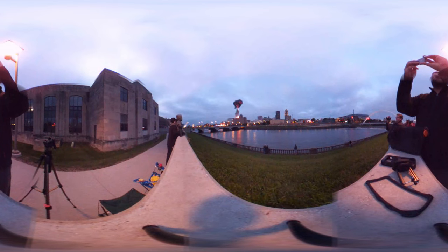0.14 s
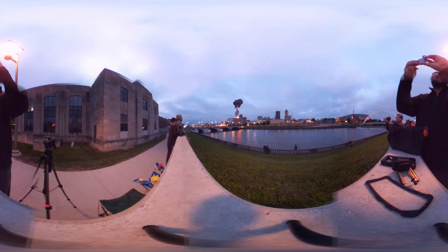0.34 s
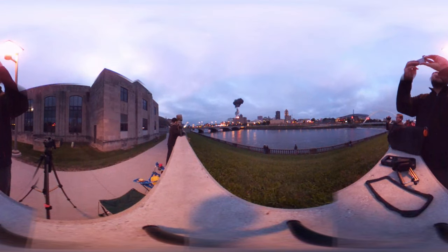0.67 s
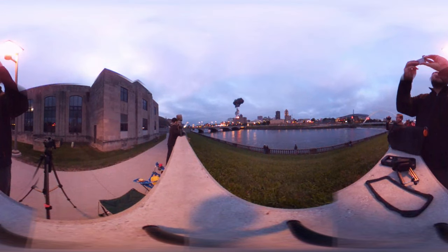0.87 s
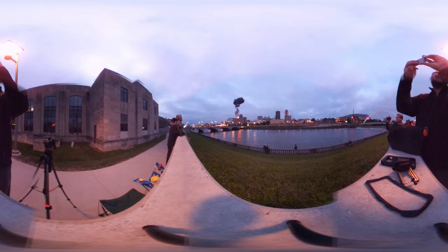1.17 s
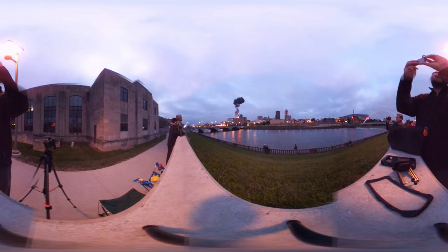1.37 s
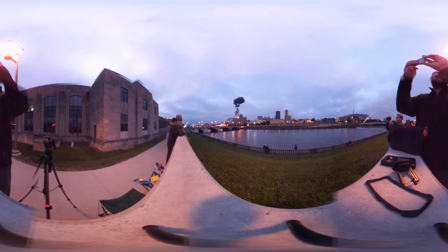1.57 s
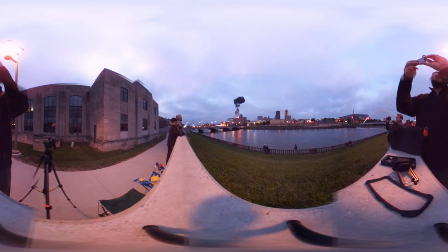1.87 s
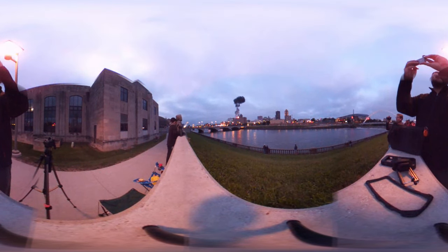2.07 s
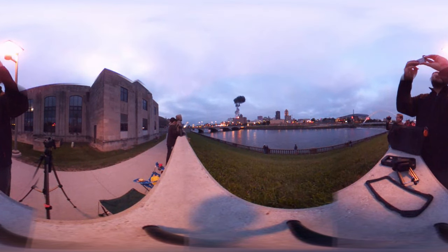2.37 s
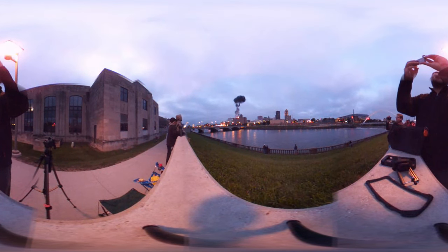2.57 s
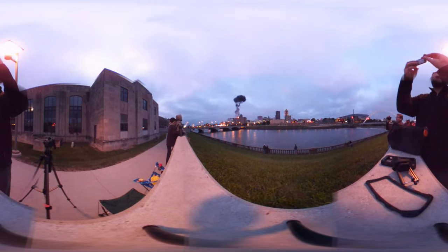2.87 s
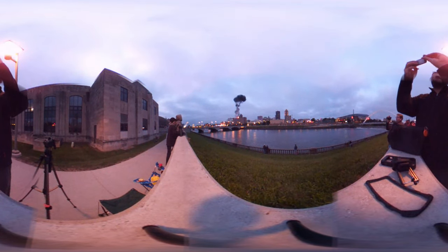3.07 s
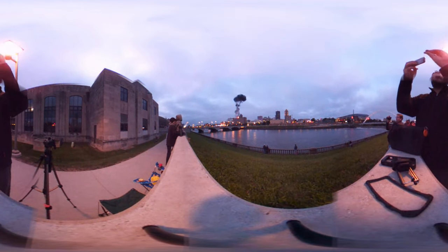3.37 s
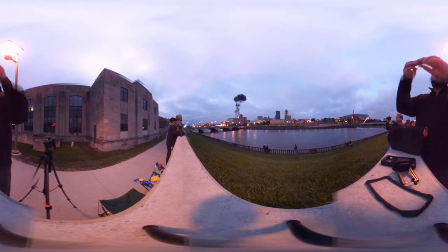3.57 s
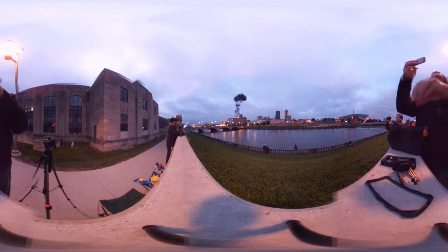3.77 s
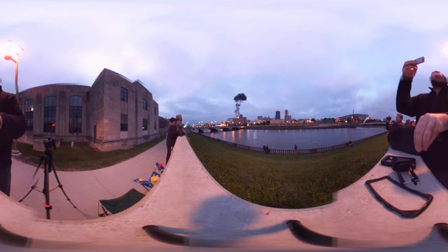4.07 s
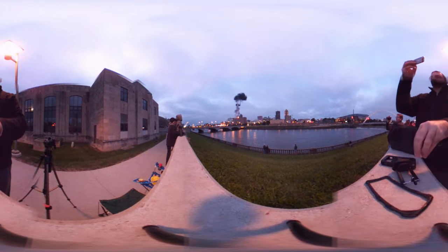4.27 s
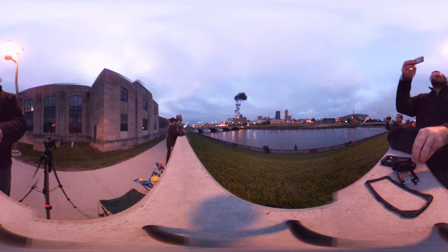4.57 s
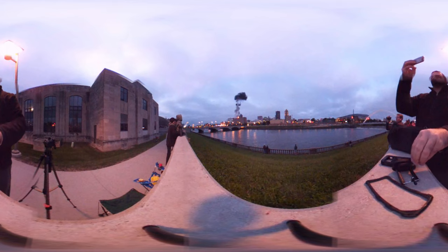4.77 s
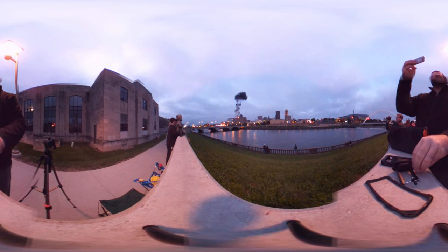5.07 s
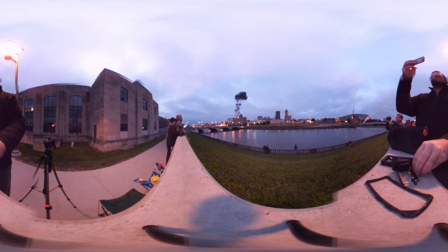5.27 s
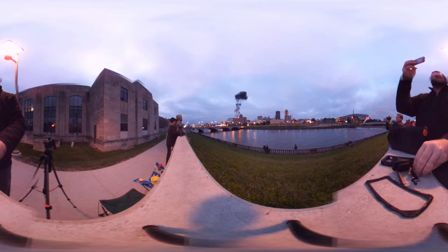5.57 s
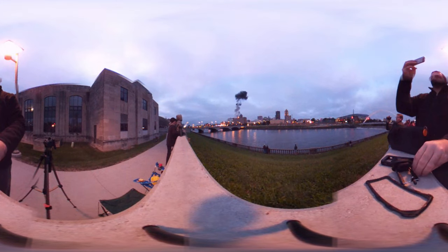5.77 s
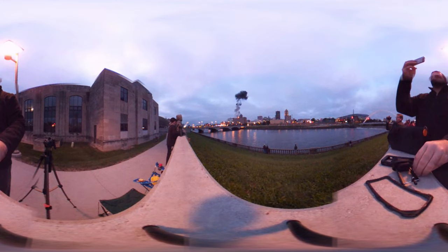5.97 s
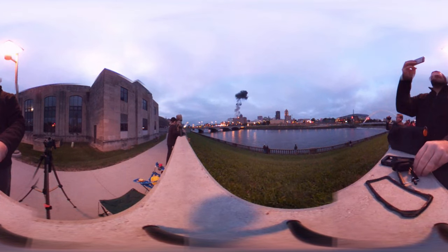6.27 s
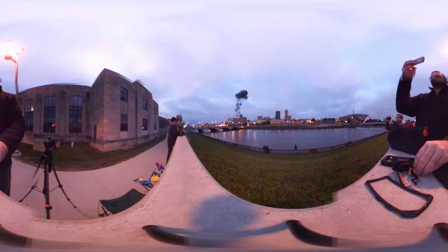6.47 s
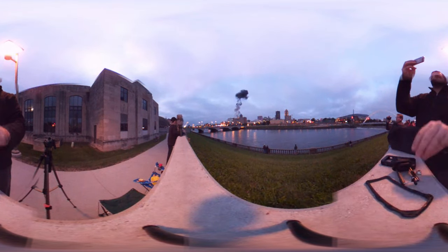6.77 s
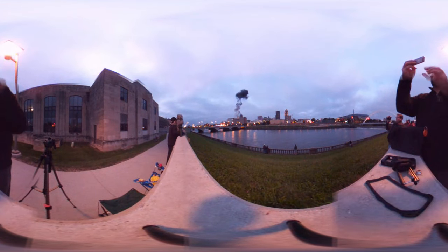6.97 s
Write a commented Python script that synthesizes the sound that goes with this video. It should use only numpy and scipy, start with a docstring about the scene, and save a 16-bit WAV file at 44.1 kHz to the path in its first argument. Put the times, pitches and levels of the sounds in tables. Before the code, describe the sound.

Heard across open water: isolated explosive charges, each a hard low shock with ragged noise and scattered city echoes, the second later one softer and rounder. Rolling rumble dies away for about two seconds. Suddenly charges fire in quick irregular succession, piling into a heavy uneven roar with falling debris clatter. The narrow-band microphone overloads, flattening the bass and adding harsh crackle.

```python
"""Blowing down a tower across a river

Single charges bang about once a second, each a shock wave with a ragged body and scattered reflections.
The same facades slap each one back as a smeared burst on a low thump, and shaped noise and pulses roll around the city.
Then a dense barrage of sharp reports merges into the booms, rattling rubble and gritty crackle of the collapse.
The pressure swings overload the microphone input, which clips and makes the rumble crackle further."""
import sys
import numpy as np
from scipy import signal
from scipy.fft import rfft, irfft, next_fast_len
from scipy.io import wavfile
from scipy.ndimage import uniform_filter1d, map_coordinates

SR = 44100
rng = np.random.default_rng(int(sys.argv[2]) if len(sys.argv) > 2 else 0)


def log_audio(samples):
    """Write samples as a 16-bit WAV file to the path given in sys.argv[1]."""
    # one column per channel
    frames = np.atleast_2d(samples).T
    # limit to full scale, then quantise
    limited = np.clip(frames, -1, 1)
    pcm = np.round(limited * 32767).astype(np.int16)
    wavfile.write(sys.argv[1], SR, pcm)


N = 314430

# All dB in the tables are relative levels; the functions set the final gain.
# single charges, the first just before the start: start_s, push_s, wall_bounce_db, scatter_db,
# rolling_boom_db, rolling_clatter_db, facades_early_s
CHARGES = [(-0.362, .004, -10, -3, -19.5, -29, 0), (0.7437, 0.0077, 0, -8, -16.5, -30, 0),
           (1.8661, 0.0098, -29, -12, -19.5, -31.5, .029)]
# reports that stand out, a lone thud and then the barrage: start_s, crack_db, front_s, thump_db
REPORTS = [(2.376, -51, 0.01, -10), (4.159, -18.5, 0.0023, -17), (4.19, -18.5, 0.0072, -4),
           (4.207, -21, 0.0063, 4), (4.332, -14.5, 0.0067, -2), (4.368, -17.5, 0.0044, -3.5),
           (4.507, -13.5, 0.0079, -1.5), (4.567, -19, 0.0035, -10.5), (4.611, -24.5, 0.0036, -6),
           (4.672, -25.5, 0.0054, -0.5), (4.706, -21.5, .005, -6), (4.768, -22, 0.0054, 0),
           (4.794, -8, .0016, 8), (4.814, -17, 0.0015, 10.5), (4.834, -10, 0.0037, 5),
           (4.863, -6, 0.0064, 8), (4.889, -8, 0.0026, 5.5), (4.905, -9.5, .006, 1.5),
           (4.932, -36.5, 0.0053, 8), (4.956, -9, 0.0027, 4), (4.974, -12.5, 0.0063, 6.5),
           (5.006, -19.5, 0.0026, 5.5), (5.036, -13, 0.007, 3), (5.055, -8.5, 0.01, 4),
           (5.096, -15.5, 0.0065, 3.5), (5.138, -10, 0.0083, -0.5), (5.169, -20, 0.0035, 5),
           (5.204, -14, 0.0038, 7), (5.33, -12, 0.0062, 7.5), (5.362, -4.5, 0.0055, 9),
           (5.392, -12.5, 0.007, 5.5), (5.444, -22, 0.0062, 2), (5.478, -12, .01, -7),
           (5.546, -23.5, 0.0055, -0.5), (5.606, -23.5, 0.008, -10), (5.674, -10, 0.0023, 9),
           (5.691, -13.5, 0.01, 1), (5.754, -25, 0.0035, 2), (5.83, -16, 0.0052, 2),
           (5.913, -16, 0.0086, 6.5), (5.946, -11, 0.0062, 16), (5.999, -7.5, 0.0045, -2),
           (6.017, -13.5, 0.0015, -2.5), (6.07, -21, 0.0073, -3), (6.231, -13.5, 0.0026, 1),
           (6.334, -14, 0.0038, 1), (6.394, 6, 0.0037, 9.5), (6.41, 2, 0.0015, 7),
           (6.428, -13, 0.0017, 4.5), (6.442, 0.5, 0.0065, 2.5), (6.471, -8.5, 0.0023, -7),
           (6.555, -16.5, 0.0049, -12), (6.59, -15, 0.0087, -1), (6.625, -20, 0.0096, -0.5),
           (6.656, -17, 0.0045, 6), (6.727, -17, 0.0071, 1.5), (6.916, -23, 0.012, -5),
           (7.007, -16.5, 0.009, -1), (7.093, -3.5, 0.0029, -1)]


def amp(db):
    """Decibels to gain."""
    return 10 ** (np.asarray(db) / 20)


def unit(x):
    """Scale to rms 1."""
    return x / np.sqrt(np.mean(x ** 2) + 1e-20)


def curves(rows):
    """One value per sample for each column after the time."""
    s, *cols = np.transpose(rows)
    return [np.interp(np.arange(N) / SR, s, c) for c in cols]


def since(s):
    """Seconds gone by since time s, zero before it."""
    return np.maximum(np.arange(N) / SR - s, 0)


def wobble(rate):
    """A smooth random curve, rate knots a second."""
    knots = rng.standard_normal(1024)
    return map_coordinates(knots, [np.arange(N) * rate / SR], mode="wrap")


def lowpass(x, order, cutoff_hz):
    """Roll off the treble above the cutoff."""
    return signal.lfilter(*signal.butter(order, cutoff_hz, fs=SR), x)


def coloured(x, spectrum):
    """Causal minimum-phase filter with the gain of the (Hz, dB) points, built by folding the cepstrum."""
    m = 2 * next_fast_len(len(x) // 2 + SR // 4)
    hz, db = np.transpose(spectrum)
    gain = amp(np.interp(np.log(np.fft.rfftfreq(m, 1 / SR) + 1), np.log(hz), db))
    cepstrum = irfft(np.log(gain), m)
    cepstrum[1:m // 2] *= 2
    cepstrum[m // 2 + 1:] = 0
    response = np.exp(rfft(cepstrum))
    return irfft(rfft(x, m) * response, m)[:len(x)]


def arrivals(spectrum, rate, spread_db, wash):
    """Pressure pulses at random times and sizes, rate a second, over a diffuse wash; rms 1."""
    sizes = amp(spread_db * np.clip(rng.standard_normal(N), -2, 2))
    pulses = (rng.random(N) < rate / SR) * sizes
    pulses *= rng.choice([-1, 1], N)
    return unit(coloured(unit(pulses) + wash * rng.standard_normal(N), spectrum))


def bursts(rate, life, spread_db):
    """An envelope of rms 1 that jumps at each random burst and dies away over life seconds."""
    sizes = amp(spread_db * np.clip(rng.standard_normal(N), -1.5, 1.5))
    kicks = (rng.random(N) < rate / SR) * sizes
    jumps = np.sqrt(signal.lfilter([1], [1, -np.exp(-2 / (life * SR))], kicks ** 2))
    return unit(uniform_filter1d(jumps, size=SR // 400))


def patchy(x, depth_db):
    """Many paths interfere: each band swells and sinks on its own for some 50 ms at a time; rms 1."""
    z = signal.stft(x, nperseg=1024)[2]
    field = uniform_filter1d(rng.standard_normal(z.shape), size=9, axis=0)
    field = unit(uniform_filter1d(field, size=5, axis=1))
    return unit(signal.istft(z * amp(depth_db * field), nperseg=1024)[1][:len(x)])


def shock(t, push, air_hz):
    """A blast wave: steep front, push, then suction; air rounds the front, lost bass deepens the suction."""
    u = t / push
    air = signal.butter(1, [34, air_hz], "bandpass", fs=SR)
    return -signal.lfilter(*air, (1 - u) * np.exp(-u))


def crack(spectrum, crack_db, length, tail_db, tail_t60):
    """A ragged burst and its duller tail; faint ones come from afar and have lost their treble."""
    t = np.arange(SR // 2) / SR
    air_hz = np.clip(14000 * amp(.5 * crack_db), 500, SR / 3)
    noise = coloured(rng.standard_normal(len(t)), spectrum)
    noise = unit(lowpass(noise, 2, air_hz))
    burst = 0.57 * noise * np.exp(-(t / length) ** 2)
    tail = lowpass(noise, 4, 0.73 * air_hz) * amp(tail_db - 60 * t / tail_t60)
    return amp(crack_db) * (burst + tail)


def add(track, s, sound):
    """Mix a sound in at time s, which may lie before the start."""
    start = round(s * SR)
    sound = sound[max(-start, 0):]
    part = track[max(start, 0):][:len(sound)]
    part += sound[:len(part)]


def rolling_echoes():
    """Countless reflections of each charge roll back over a steady city; weak ones have lost their treble."""
    # spectra of the low boom and of the clatter: pitch_hz, level_db per Hz
    boom_spectrum = [(12, -15), (25, -7.5), (56, 2.5), (85, -2), (120, -3.5), (170, -11), (240, -20),
                     (400, -32.5), (900, -100)]
    clatter_spectrum = [(100, -21), (260, -1), (450, -0.5), (650, -5.5), (950, -11.5), (1600, -16.5),
                        (2500, -21.5), (4000, -30), (5300, -48), (7500, -78.5)]
    city_boom_db, city_clatter_db = -41, -50
    roll_rise_s, boom_fall_db_per_s, clatter_fall_db_per_s = 0.24, 12, 10.5
    skyline_delay_s, skyline_width_s, skyline_db = 1.13, 0.14, -40

    # a faint puff just ahead of the barrage
    puff_age = since(4.02)
    puff = amp(-37) * (1 - np.exp(-puff_age / 0.011)) * np.exp(-puff_age / 0.098)
    boom_power = amp(city_boom_db) ** 2
    clatter_power = amp(city_clatter_db) ** 2 + puff ** 2
    for s, *_, low_db, high_db, _ in CHARGES:
        age = since(s)
        rise = 1 - np.exp(-age / roll_rise_s)
        # the far skyline answers with one broad swell of clatter
        skyline = amp(skyline_db) * np.exp(-((age - skyline_delay_s) / skyline_width_s) ** 2 / 2)
        boom_power = boom_power + (rise * amp(low_db - boom_fall_db_per_s * age)) ** 2
        clatter_roll = rise * amp(high_db - clatter_fall_db_per_s * age)
        clatter_power = clatter_power + clatter_roll ** 2 + skyline ** 2
    boom_db, clatter_db = 10 * np.log10(boom_power), 10 * np.log10(clatter_power)

    swell = wobble(rate=7.74)
    boom = arrivals(boom_spectrum, rate=160, spread_db=2.5, wash=0.97)
    boom *= amp(boom_db + 0.63 * swell)
    clatter = patchy(arrivals(clatter_spectrum, rate=170, spread_db=0, wash=1.8), depth_db=2.2)
    clatter *= .72 + .28 * bursts(rate=26, life=.03, spread_db=2.5)  # echoes come back in clumps
    dull = lowpass(clatter, 1, 1900)
    near = np.clip((clatter_db + 42.5) / 11, 0, 1)
    clatter = near * clatter + (1 - near) * dull
    return boom + amp(clatter_db + 0.5 * swell) * clatter


def facade_echoes():
    """The same facades answer every charge with a smeared slap on a low thump; stray ones come back only once."""
    # facades that slap each charge back: delay_s, crack_db, thump_db
    facades = [(0.285, -28, -17), (.847, -32, -19), (0.959, -32, -34), (0.993, -39, -27)]
    # stray echoes from single buildings: start_s, crack_db, thump_db
    strays = [(.122, -36, -37), (.176, -34.5, -41), (.808, -30.5, -10), (.843, -30.5, -13),
              (.905, -35, -30), (.955, -33.5, -23), (1.124, -31.5, -30.5), (1.594, -30.5, -40),
              (1.72, -32, -39), (1.899, -25, -1.5), (1.963, -32, -19), (2.012, -37, -26),
              (2.06, -31.5, -30), (2.125, -30, -30), (2.156, -36, -14), (2.86, -37, -33), (2.929, -41, -30),
              (3.036, -38.5, -44), (3.322, -40, -52), (3.442, -45, -51)]
    # spectrum of the slaps: pitch_hz, level_db per Hz
    slap_spectrum = [(150, -4.5), (450, 9.5), (900, 8.5), (1600, 5), (3000, -3), (4800, -1), (5600, -11),
                     (7000, -28)]
    smear_s = .014  # a wide facade spreads its echo
    out, t = np.zeros(N), np.arange(SR // 2) / SR
    slaps = []
    for s, *_, early in CHARGES:
        for delay, crack_db, thump_db in facades:
            slaps.append((s + delay - early, crack_db, thump_db))
    for s, crack_db, thump_db in slaps + strays:
        add(out, s, crack(slap_spectrum, crack_db, smear_s, tail_db=-10.5, tail_t60=0.55))
        thump_hz = 45 * amp(0.7 * rng.standard_normal())  # pitch scatters a little
        thump = np.sin(2 * np.pi * thump_hz * t) ** 3 * amp(-60 * t / 0.21)  # peaky swings
        add(out, s + 0.002 - .5 / thump_hz, -amp(thump_db + 1.5) * thump)
    return out


def charges():
    """Each charge: a shock and its bounce off a nearby wall, both with a ragged body, and waterfront scatter."""
    # spectra of the ragged body and of the scatter: pitch_hz, level_db per Hz
    blast_spectrum = [(100, -27), (300, 11.5), (650, 3.5), (1000, -8), (2000, -15.5), (4000, -18),
                      (6000, -24), (7500, -54)]
    scatter_spectrum = [(15, -1), (40, 12.5), (80, -9), (125, 6.5), (190, -6.5), (300, -19), (620, -17.5),
                        (900, -28.5), (2000, -34.5), (4200, -40.5), (5200, -51.5), (6400, -71),
                        (8000, -73.5)]
    shock_db, shock_air_hz, wall_delay_s = 2.5, 1270, .033
    blast_db, wall_blast_db, blast_t60_s = -14.5, -15.5, 0.1
    near_t60_s, far_t60_s, far_db, far_air_hz = 0.82, 2.7, -20, 2600  # near and far buildings
    out, t = np.zeros(N), np.arange(SR) / SR
    for s, push, bounce_db, scatter_db, *_ in CHARGES:
        add(out, s, amp(shock_db) * shock(t, push, shock_air_hz))
        bounce = shock(t, push, shock_air_hz / 4)
        add(out, s + wall_delay_s, amp(shock_db + bounce_db) * bounce)
        for delay, db in (0, blast_db), (wall_delay_s, wall_blast_db + 0.97 * bounce_db):
            body = unit(coloured(rng.standard_normal(SR), blast_spectrum))
            add(out, s + delay, body * amp(db - 60 * t / blast_t60_s))
        scatter = arrivals(scatter_spectrum, rate=540, spread_db=3.5, wash=0.93)[:SR]
        scatter = patchy(scatter, depth_db=2.2)
        near = scatter * amp(-60 * t / near_t60_s)
        far = lowpass(scatter, 2, far_air_hz) * amp(far_db - 60 * t / far_t60_s)
        onset = 1 - np.exp(-t / 0.0025)
        add(out, s, amp(scatter_db + 3.0) * (near + far) * onset)
    return out


def reports():
    """Each report flips the pressure across a cracking front; short ones snap, long ones crunch. Debris trails."""
    # spectrum of the cracks: pitch_hz, level_db per Hz
    crack_spectrum = [(100, -10.5), (400, 21.5), (800, 7), (1500, 1.5), (2800, -5.5), (4300, -7),
                      (5700, -14), (6600, -26.5), (8000, -33)]
    out, lead = np.zeros(N), SR // 20
    t = np.arange(-lead, lead) / SR
    for s, crack_db, front_s, thump_db in REPORTS:
        add(out, s, crack(crack_spectrum, crack_db, 1.26 * front_s, tail_db=-16.5, tail_t60=0.29))
        # the pressure swing on each side of the front, its length scattered by 1.5 dB
        swing_s = 0.0064 * amp(1.5 * rng.standard_normal())
        beyond = np.maximum(np.abs(t) - front_s / 2, 0)
        swing = -np.tanh(2 * t / front_s) ** 3 * np.exp(-(beyond / swing_s) ** 2)
        add(out, s + front_s / 2 - lead / SR, amp(thump_db - 0.5) * swing)
    return out


def collapse():
    """Booms of the barrage and falling frame overlap, deeper when strong; rubble rattles and grit crackles in bursts."""
    # the barrage and the collapse: start_s, boom_strength_db, rubble_rattle_db
    roar = [(4.17, 0, -24.5), (4.22, -7, -25), (4.29, -11, -29), (4.37, -6.5, -22), (4.45, -17, -33),
            (4.55, -7.5, -28.5), (4.61, -5.5, -22), (4.73, -5, -24), (4.84, 3.5, -19), (4.98, 2.5, -22.5),
            (5.07, 0, -30.5), (5.19, -3.5, -20.5), (5.28, -8.5, -21.5), (5.37, -9.5, -23), (5.46, -7, -19),
            (5.53, -8, -20.5), (5.61, -13.5, -25.5), (5.7, -4, -17), (5.79, -6, -21), (5.93, -3.5, -26),
            (6.02, -2, -16), (6.15, -11.5, -26), (6.22, -5, -20), (6.31, -10.5, -24), (6.43, 7, -13),
            (6.53, -7.5, -23), (6.63, -3.5, -17.5), (6.76, -9.5, -28), (6.82, -9.5, -24.5),
            (6.88, -13.5, -24.5), (6.95, -13.5, -22.5), (7.03, -10.5, -20), (7.12, -2, -26)]
    # treble crackle: start_s, level_db
    grit_levels = [(4.18, -41), (4.29, -39.5), (4.35, -40.5), (4.42, -46.5), (4.57, -36.5), (4.68, -37),
                   (4.9, -32.5), (5.22, -34.5), (5.32, -39.5), (5.52, -36.5), (5.62, -39), (5.71, -39),
                   (5.78, -40.5), (5.85, -38), (6.07, -34.5), (6.15, -40), (6.34, -36), (6.47, -37.5),
                   (6.61, -35), (6.75, -41), (6.89, -45), (7.02, -34.5), (7.12, -41)]
    # spectra of booms, deepest swings, rattle and crackle: pitch_hz, level_db per Hz
    boom_spectrum = [(10, -14.5), (22, -11), (32, 4), (48, 1), (63, 3.5), (82, -3.5), (125, 0),
                     (180, -11.5), (270, -20.5), (450, -32.5), (900, -100)]
    heave_spectrum = [(12, -29.5), (24, 1), (33, 5.5), (48, 1.5), (80, -10.5), (200, -52.5), (700, -115)]
    rattle_spectrum = [(100, -25), (270, 3.5), (500, 5.5), (660, 1), (880, -5), (1500, -13), (2500, -20.5),
                       (5000, -65)]
    grit_spectrum = [(500, -27.5), (1000, 4), (1600, 1.5), (2500, -0.5), (4300, -6), (4900, -12.5),
                     (5500, -43.5), (6500, -66)]
    attack_s, rubble_rise_s = 0.022, 0.037
    heave_db, heave_growth = -8, 1.3  # the deepest swings grow faster than the booms
    surge_share = 0.073  # share of rattle and grit that comes in bursts
    grit_cutoff_hz, grit_dull_db, grit_bright_db = 2860, -51, -31

    strength_db, rattle_db = curves(roar)
    grit_db, = curves(grit_levels)
    age = since(4.158)
    boom = amp(strength_db + 1.87) * arrivals(boom_spectrum, rate=130, spread_db=1.0, wash=0.34)
    heave = arrivals(heave_spectrum, rate=44, spread_db=3.5, wash=0.4)
    boom += amp(heave_db + heave_growth * strength_db) * heave
    boom *= np.minimum(age / attack_s, 1)

    surge = 1 - surge_share + surge_share * bursts(rate=40, life=.012, spread_db=3)
    rattle = coloured(surge * rng.standard_normal(N), rattle_spectrum)
    rattle = amp(rattle_db - 0.5) * patchy(rattle, depth_db=1.8)
    grit = unit(surge * arrivals(grit_spectrum, rate=1300, spread_db=-2.0, wash=2.0))
    # weak crackle is dull, its treble gone
    dull = signal.filtfilt(*signal.butter(2, grit_cutoff_hz, fs=SR), grit)
    bright = np.clip((grit_db - grit_dull_db) / (grit_bright_db - grit_dull_db), 0, 1)
    grit = amp(grit_db + 2) * (dull + bright * (grit - dull))
    rubble = (rattle + grit) * (1 - np.exp(-age / rubble_rise_s))

    # around each sharp report its own swing takes the place of the random roar
    times = np.array(REPORTS)[:, 0]
    marks = np.bincount(np.round(times * SR).astype(int), minlength=N)[:N]
    own = signal.fftconvolve(marks, np.hanning(SR // 34), "same")
    between = 1 - .85 * np.clip(1.1 * own, 0, 1)
    return between * boom + np.sqrt(between) * rubble


def scene():
    """Everything arrives at one microphone."""
    echoes = rolling_echoes() + facade_echoes()
    return (echoes + charges() + reports() + collapse())[None]


def record(dry):
    """The input clips flat on large pressure swings, a little treble rides on top; the recorder's band is narrow."""
    clip_level, leak_db, leak_hz, top_hz = .705, -20, 400, 7550
    clipped = dry / (1 + np.abs(dry / clip_level) ** 14) ** (1 / 14)
    leak_filter = signal.butter(4, leak_hz, "highpass", fs=SR, output="sos")
    excess = signal.sosfilt(leak_filter, dry - clipped)
    clipped = clipped + amp(leak_db) * excess
    m = next_fast_len(N + SR // 4)
    band = 1 / np.sqrt(1 + (np.fft.rfftfreq(m, 1 / SR) / top_hz) ** 60)
    return irfft(rfft(clipped, m) * band, m)[..., :N]


dry = scene()
out = record(dry)
log_audio(out)
```